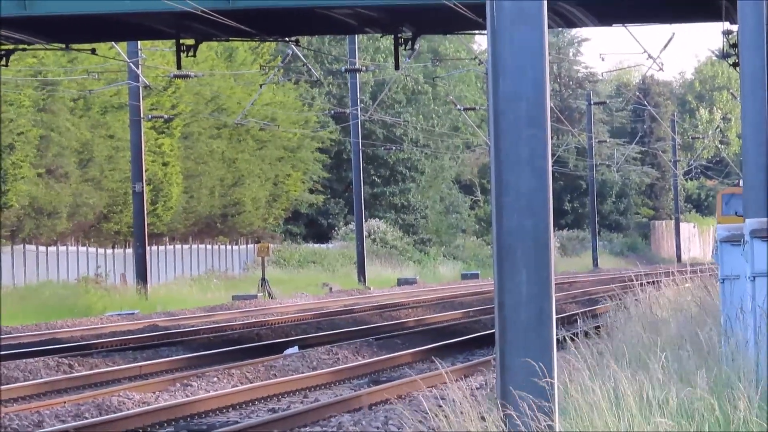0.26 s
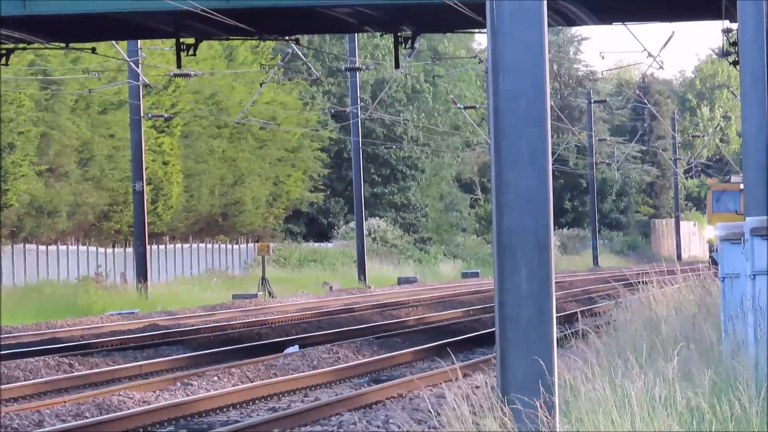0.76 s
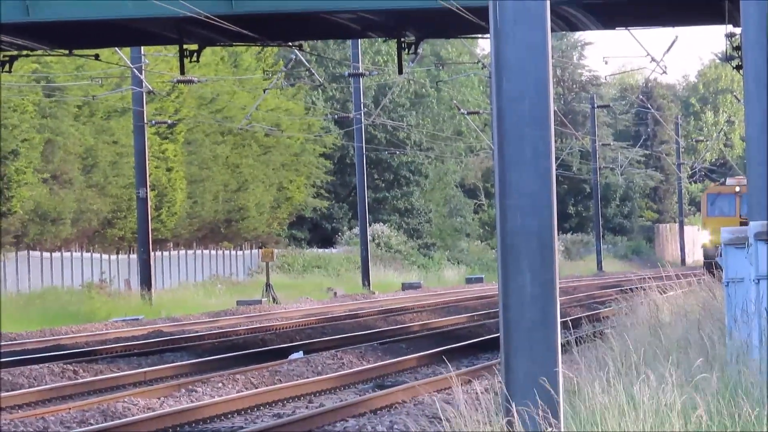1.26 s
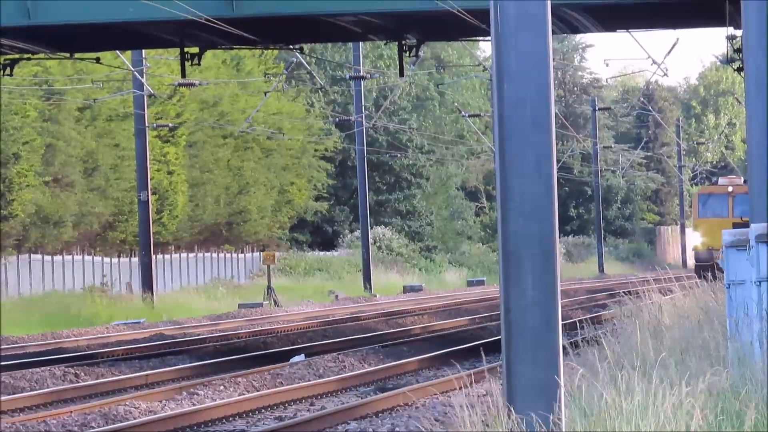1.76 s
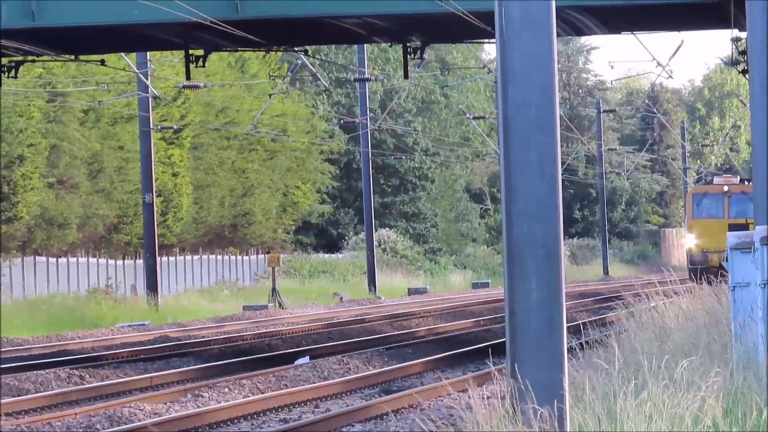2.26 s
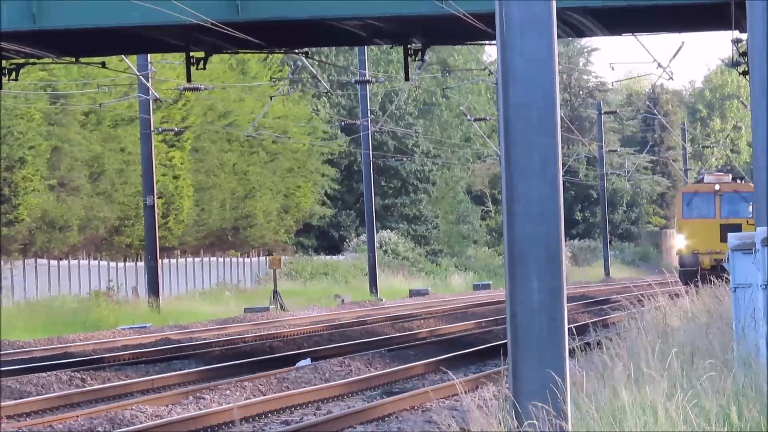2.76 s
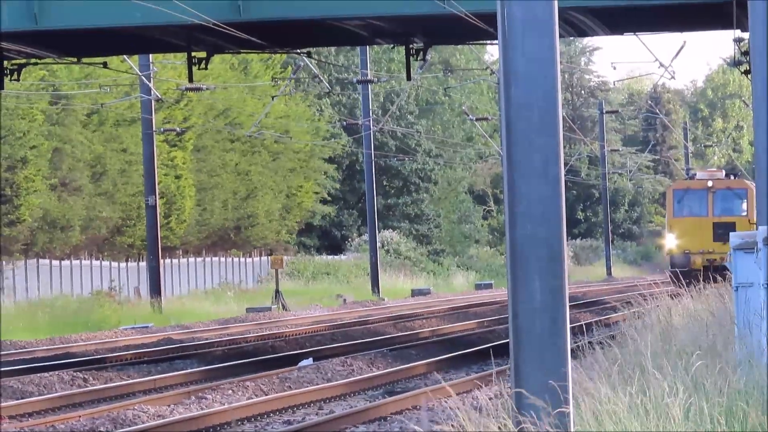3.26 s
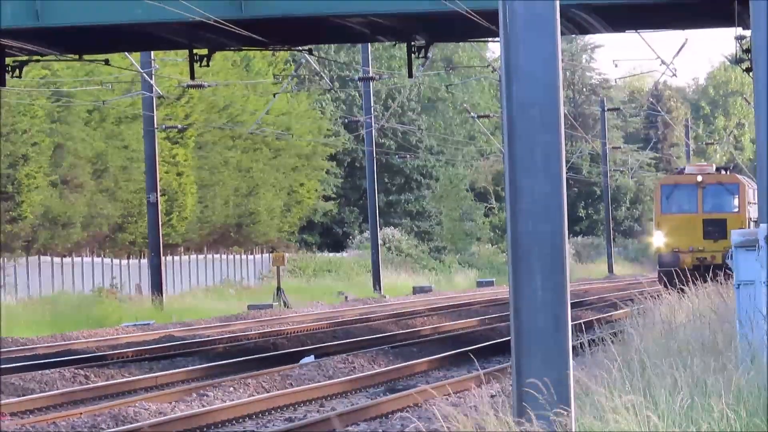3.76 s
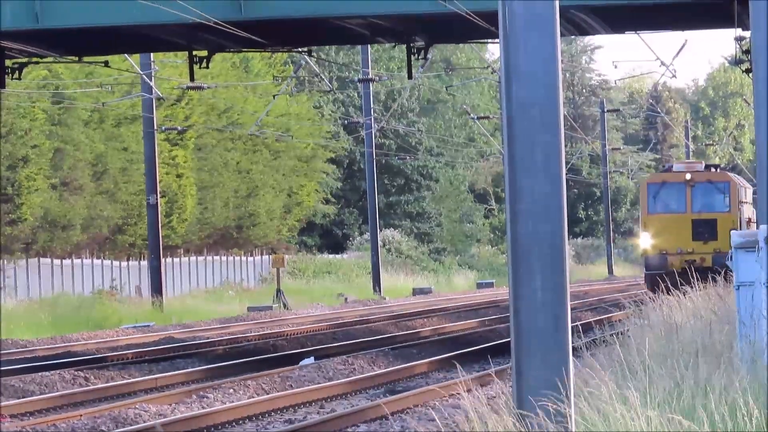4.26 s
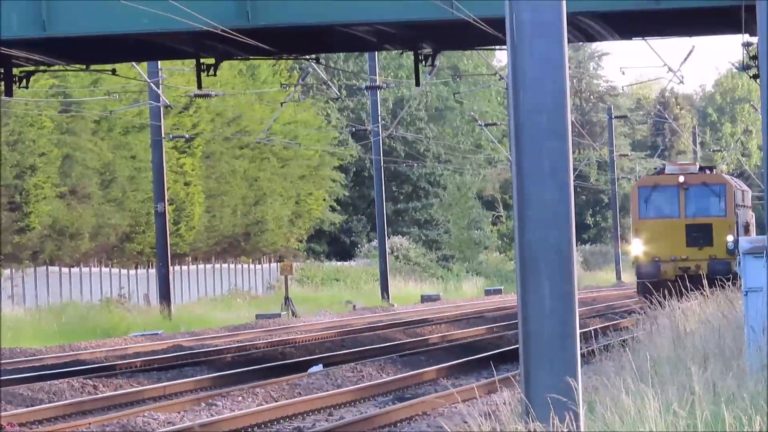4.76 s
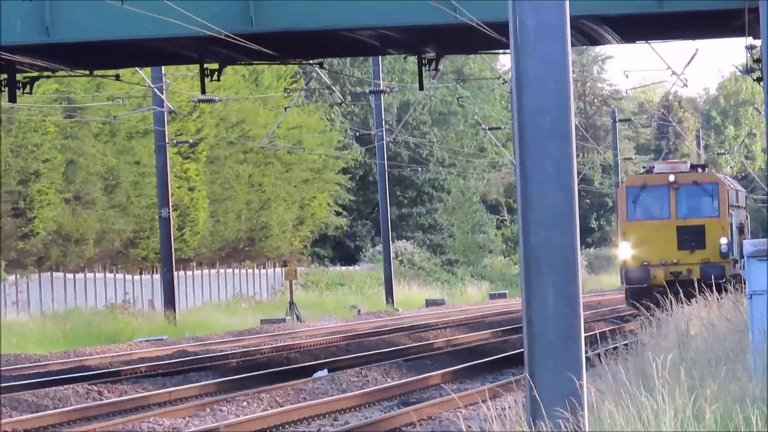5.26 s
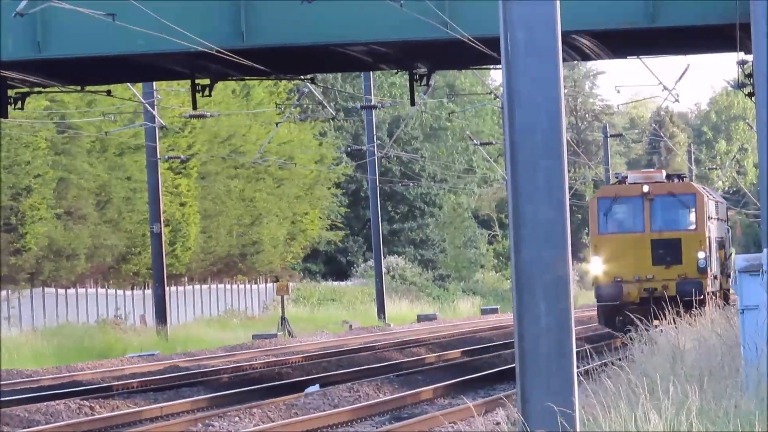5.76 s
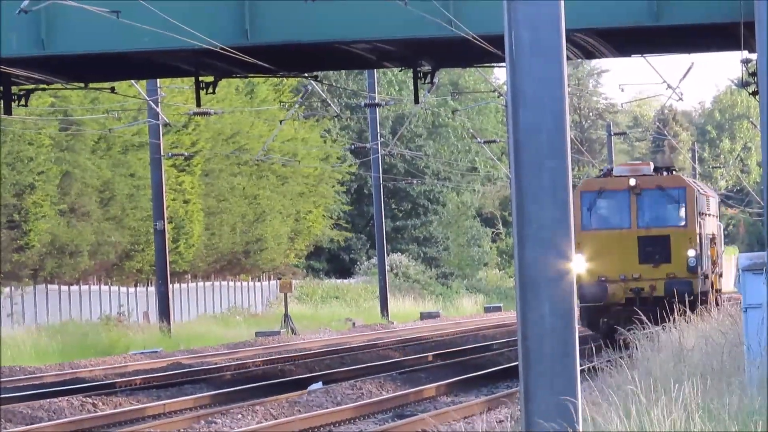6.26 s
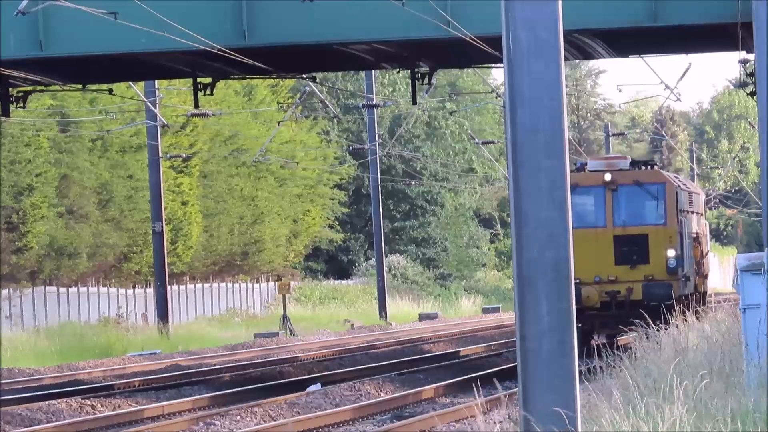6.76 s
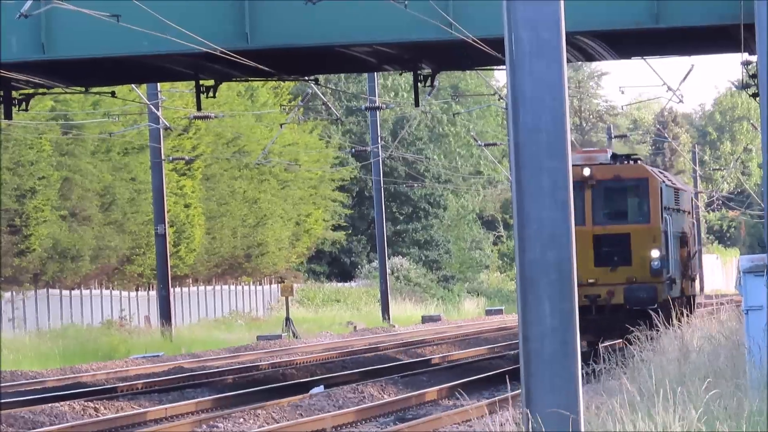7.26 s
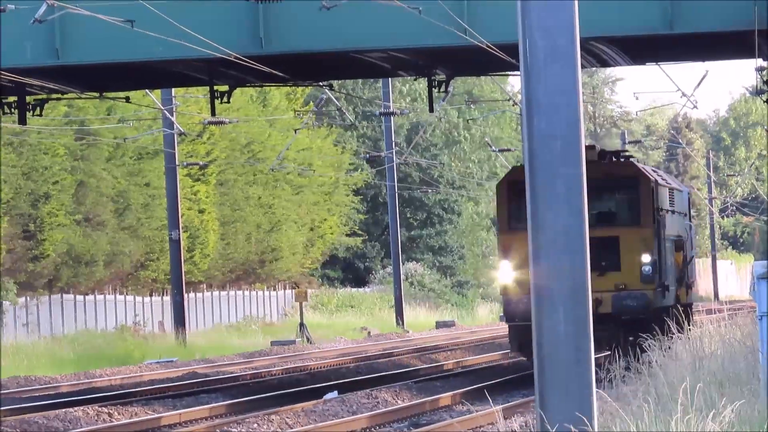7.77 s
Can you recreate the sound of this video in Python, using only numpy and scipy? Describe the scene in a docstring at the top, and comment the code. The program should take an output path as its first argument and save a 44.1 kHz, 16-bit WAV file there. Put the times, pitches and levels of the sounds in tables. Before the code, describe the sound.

Wind buffets and pops the microphone while a track machine slowly nears, its wheels beating the rails rapidly over a growing drone and hiss.

```python
"""Gusts rumble on the microphone first, low filtered noise, with a pigeon's coo (gliding sines) beneath.
Its two capsules overload and pop as they stick and again as they free: steps that die away.
A track machine nears along the rails: rough rolling, and wheels beating them fifteen times a second.
A drone and whines come with it. A small bird chirps; hiss, faint mains buzz and a flickering whistle
lie in the treble."""
import sys
import numpy as np
from scipy.fft import rfft, irfft, next_fast_len
from scipy.io import wavfile
from scipy.ndimage import map_coordinates

SR = 44100
rng = np.random.default_rng(int(sys.argv[2]) if len(sys.argv) > 2 else 0)


def inscribe(sig):
    """Save sig as 16-bit PCM at rate SR to the path in sys.argv[1].

    A 1-D sig is mono; a 2-D sig holds one channel per row.
    Samples are clipped to [-1, 1] before scaling.
    """
    pcm = np.round(np.clip(np.atleast_2d(sig).T, -1, 1) * 32767)
    wavfile.write(sys.argv[1], SR, pcm.astype(np.int16))


N = 353682
TIME = np.arange(N) / SR  # s


def amp(db):
    """Gain of a level in dB."""
    return 10 ** (np.asarray(db) / 20)


def unit(x):
    """Scaled to rms 1."""
    return x / np.sqrt(np.mean(x ** 2) + 1e-20)


def along(points, hz):
    """Value at each frequency from (f/Hz, value) points, joined on a log axis."""
    f, value = np.transpose(points)
    return np.interp(np.log(hz + 1), np.log(f + 1), value)


def curves(rows):
    """One value per sample for each column after the time."""
    seconds, *columns = np.transpose(rows)
    return [np.interp(TIME, seconds, column) for column in columns]


def wobble(rate):
    """A smooth random curve, rate knots a second."""
    knots = rng.standard_normal(int(N * rate / SR) + 4)
    return map_coordinates(knots, [TIME * rate])


def filtered(x, response):
    """x times a complex response of frequency."""
    m = next_fast_len(N + SR // 2)  # padded so that tails do not wrap round
    spectrum = rfft(x, m) * response(np.fft.rfftfreq(m, 1 / SR))
    return irfft(spectrum, m)[..., :N]


def noise(response):
    """Coloured noise of rms 1."""
    return unit(filtered(rng.standard_normal(N), response))


def band(centre_hz, width_hz):
    """Narrow noise: a fuzzy tone."""
    return noise(lambda hz: 1 / (1 + (2 * (hz - centre_hz) / width_hz) ** 2))


def spikes(seconds, sizes):
    """Silence with one sample set at each moment."""
    at = np.clip(np.round(seconds * SR).astype(int), 0, N - 1)
    return np.bincount(at, sizes, N)


def decay(hz, seconds):
    """Response of a jump that dies exponentially."""
    return SR * seconds / (1 + 2j * np.pi * hz * seconds)


# Level of the rails and treble: sinks after bursts of pops, then swells;
# engine() and the rail functions use it too.
# Columns: t/s, base level of the rails/dB, base level of the treble/dB
BASE_LEVELS = [(0.0, -34.5, -45.5), (0.7, -38, -49), (1.42, -40, -52.5), (2.41, -31, -48.5),
               (3.25, -26.5, -43.5), (4.3, -28.5, -46), (4.5, -32.5, -50.5), (4.94, -40, -56),
               (5.21, -37, -56.5), (8.01, -21, -42)]
# Colour of the far hiss. Columns: f/Hz, relative level per Hz/dB
HISS_COLOUR = [(900, -95), (1400, 2), (3100, -7.5), (5900, -10.5), (7300, -14), (8200, -18.5),
               (11000, -22.5), (14800, -26.5), (15700, -21)]
# Mains buzz lines. Columns: f/Hz, level before the treble gains/dB
BUZZ_LINES = [(3548, -66), (3648, -66), (3947, -68), (7145, -72), (7245, -74), (12042, -80), (14340, -77),
              (14540, -75.5), (14740, -78), (15240, -79)]
ROAR_S, ROAR_DB = 4.4, -5  # the roar grows for one second from here; dB over the treble level


def treble():
    """Far hiss, buzz sines, a flickering whistle that fades in, high bands and a late roar, on one level."""
    treble_db = curves(BASE_LEVELS)[1]
    flicker = amp(.8 * wobble(7) + .8 * wobble(40))
    hiss = flicker * noise(lambda hz: amp(along(HISS_COLOUR, hz)) * (hz < 15750))
    buzz = np.zeros(N)
    for hz, db in BUZZ_LINES:
        buzz += amp(db + wobble(6)) * np.sin(2 * np.pi * (hz * TIME + rng.random()))
    whistle_db = -17.5 + 3.03 * np.minimum(TIME, 2) + 3.7 * wobble(25)
    whistle = amp(whistle_db) * band(6473, 94)
    high_bands = band(10650, 350) + amp(-4) * band(11800, 300)
    high_bands *= amp(-22.5) * np.minimum(TIME / 2, 1)
    roar = amp(ROAR_DB) * np.clip(TIME - ROAR_S, 0, 1) * band(2750, 950)
    return amp(treble_db) * (hiss + whistle + roar + high_bands + amp(49.5) * buzz)


def swell(start, end):
    """Progress from 0 to 1 through a note, and a rounded rise and fall over it."""
    u = np.clip((TIME - start) / (end - start), 0, 1)
    return u, np.sqrt(np.abs(np.sin(np.pi * u))) * (u < 1)


def bird(notes, waver_hz):
    """Soft gliding sine notes, the pitch wavering at random."""
    out, drift = np.zeros(N), waver_hz * wobble(20)
    for start, end, first_hz, last_hz, db in notes:
        u, envelope = swell(start, end)
        pitch = first_hz + (last_hz - first_hz) * u + drift
        out += amp(db) * envelope * np.sin(2 * np.pi * np.cumsum(pitch) / SR)
    return out


# Pigeon notes, the first already under way at t = 0.
# Columns: start t/s, end t/s, first f/Hz, last f/Hz, level/dB
PIGEON_COOS = [(-.1, .13, 515, 508, -43), (.3, .62, 500, 508, -41), (1.4, 1.58, 500, 482, -43),
               (1.71, 2.1, 488, 465, -45.5)]


def pigeon():
    """Low coos: sines with little waver."""
    return bird(PIGEON_COOS, waver_hz=3)


# Small bird's notes. Columns: start t/s, length/ms, first f/Hz, last f/Hz, level/dB
BIRD_CHIRPS = [(3.132, 10, 4900, 4400, -49), (3.155, 9, 4800, 4350, -49), (3.199, 15, 5450, 4450, -46),
               (3.234, 10, 5250, 4350, -44)]


def small_bird():
    """Short falling chirps: sines with more waver."""
    notes = [(s, s + ms / 1000, first, last, db) for s, ms, first, last, db in BIRD_CHIRPS]
    return bird(notes, waver_hz=40)


# Gusts at the microphone.
# Columns: t/s, rumble level/dB, flutter level before its random swells/dB
GUSTS = [(0, -18, -29), (.45, -18.5, -35.5), (.7, -15, -34), (1.1, -14, -44), (1.5, -20.5, -46),
         (2.15, -27.5, -48), (2.7, -24.5, -59), (3.05, -15, -33.5), (3.7, -12, -34), (4.3, -8.5, -28.5),
         (4.5, -15, -40), (4.62, -12, -42), (4.74, -6, -43), (4.86, -18, -46), (5.05, -15.5, -44),
         (5.4, -24.5, -54), (5.62, -19.5, -55), (5.82, -30, -63), (5.98, -14.5, -49), (6.55, -21, -64),
         (7, -13, -41), (7.2, -28, -56), (8.02, -20, -58)]
# Colour of the low turbulence. Columns: f/Hz, relative level per Hz/dB
RUMBLE_COLOUR = [(8.8, -18), (15, 8.5), (50, 1.5), (233, -26), (327, -32.5), (413, -33.5), (470, -52),
                 (1100, -120)]


def wind():
    """Low turbulence in lumps and a higher flutter that shares them, the same on both capsules."""
    rumble_db, flutter_db = curves(GUSTS)
    lumps = wobble(14)
    rumble = unit(amp(2.1 * lumps) * noise(lambda hz: amp(along(RUMBLE_COLOUR, hz))))
    flutter = noise(lambda hz: np.exp(-((hz - 120) / 90) ** 2))
    flutter *= amp(1.9 * wobble(9.8) + 2.0 * lumps)
    return amp(rumble_db) * rumble + amp(flutter_db) * flutter


# Overloads of the microphone's two capsules; dips() uses them too. Columns: start t/s, held/ms,
# right step, left step (linear, before filters), left sticks longer at each end/ms (0: a small scatter)
CAPSULE_OVERLOADS = [(0.2568, 10.9, 1.05, .7, 1.8), (0.4479, 1.5, 0, .65, 0), (0.4496, .65, 0, .65, 0),
                     (0.451, .3, 0, .6, 0), (0.5768, 3.1, .8, .53, .8), (0.6566, 14, .77, .44, .7),
                     (0.7191, 8.7, .55, .2, -.6), (0.9407, 26.4, .8, .51, .3), (0.9897, 12.8, .51, .19, 0),
                     (1.0335, 16.4, .76, .43, .3), (1.0638, 21.7, .46, .16, 0),
                     (1.1051, 14.8, .67, .35, .5), (1.2222, 7.2, .44, .15, 0), (1.2442, 35, .7, .38, .8),
                     (1.2992, 10.7, .45, .17, 0), (1.3341, 12.9, .71, .41, .4), (1.4366, .5, .36, 0, 0),
                     (1.4373, 7.8, .36, 0, 0), (1.441, 1.3, 0, .15, 0), (1.7769, 6.2, 0, .5, 0),
                     (1.7834, .6, 0, .6, 0), (4.416, 5.1, .62, .6, .3), (4.7341, .4, .39, 0, 0),
                     (4.7349, .5, .44, 0, 0), (4.7422, 5.4, .32, .2, 0), (4.7672, 5.3, .16, .11, 0),
                     (4.8057, 8.6, .17, .12, 0), (4.8236, 5.1, .17, .12, 0), (4.8755, 15, .16, .11, 0),
                     (4.9517, 15.9, .13, .1, 0), (4.981, 18.9, .13, .09, 0), (5.1751, 7.5, .18, .12, .45),
                     (5.9444, 4.9, .3, .21, .8), (6.0266, 35.9, .34, .22, .3), (6.1074, 13, .36, .22, 1.6),
                     (6.1143, 4.2, .36, 0, 0), (6.1658, 4.1, .32, .25, .8), (6.2443, .25, .36, .24, 2),
                     (6.2453, .3, .36, 0, 0), (6.83, 9.3, .44, .3, .7)]


def pops():
    """Each capsule jumps as it sticks at its limit and back as it frees; the gust pushes, then sags."""
    start, held_ms, right, left, longer_ms = np.transpose(CAPSULE_OVERLOADS)
    side = np.array([[-1], [1]])  # -1 at the start, 1 at the end
    right_s = start + (side > 0) * held_ms / 1000
    scatter = rng.uniform(.0001, .0008, (len(start), 2)).T
    # left outlasts right where its step is over .45 of the right's, else right outlasts left
    scatter *= np.where(left > .45 * right, 1, -1)
    longer_s = np.where(longer_ms != 0, longer_ms / 1000, scatter * (right > 0))
    left_s = right_s + side * longer_s
    left_kicks = spikes(left_s.ravel(), (-side * left).ravel())
    right_kicks = spikes(right_s.ravel(), (-side * right).ravel())
    kicks = np.array([left_kicks, right_kicks])
    jump = filtered(kicks, lambda hz: decay(hz, 0.00074) * 1j * hz / (120 + 1j * hz))
    # a dull copy leaks across to the other capsule
    leak = filtered(jump[::-1], lambda hz: amp(-9.0) / (1 + 1j * hz / 350))
    push = filtered(kicks.mean(0), lambda hz: amp(37) * hz / 60 * np.exp(-(hz / 60) ** 2))
    sag_spikes = spikes(start + .004, np.maximum(right, left))
    sag = filtered(sag_spikes, lambda hz: -amp(47) * np.exp(-(hz / 70) ** 2) * hz / (hz + 15))
    return jump + leak + push + sag


DIP_DB, DIP_S = 2, 0.035  # depth for a step of 1, time constant of the recovery


def dips():
    """Gain of the sound beyond the microphone: it drops as a capsule frees and soon recovers."""
    start, held_ms, right, left, _ = np.transpose(CAPSULE_OVERLOADS)
    freed = spikes(start + held_ms / 1000, np.maximum(right, left))
    return amp(-DIP_DB * filtered(freed, lambda hz: decay(hz, DIP_S)))


# Faint pitched hiss from the machine.
# Columns: start t/s, end t/s, centre f/Hz, width/Hz, level before a random waver/dB
ENGINE_WHINES = [(1.2, 6.5, 1647, 40, -57.5), (3.9, 4.9, 2510, 30, -58), (3.8, 4.9, 2860, 250, -55.5),
                 (5.4, 17, 2084, 140, -50), (5.5, 13.4, 1600, 200, -47.5)]
DRONE_DB, DRONE_GAINS_DB_PER_S = -26, 1.85  # drone band over the rails at t = 0; it gains on them


def engine():
    """A narrow drone that gains on the rails as the machine nears, and fainter whines that come and go."""
    pitch = 416 + 6 * wobble(8)
    tone = np.sin(2 * np.pi * np.cumsum(pitch) / SR) * amp(1.5 * wobble(4))
    drone_db = curves(BASE_LEVELS)[0] + DRONE_DB + DRONE_GAINS_DB_PER_S * TIME
    out = amp(drone_db) * (band(413, 64) + amp(3.5) * tone)
    for start, end, hz, width_hz, db in ENGINE_WHINES:
        _, envelope = swell(start, end)
        out += amp(db + wobble(13)) * envelope * band(hz, width_hz)
    return out


# Band that the rail passes. Columns: f/Hz, relative level per Hz/dB
RAIL_BAND = [(300, -15), (420, -17.5), (500, -13), (600, -6), (800, -13), (980, -11), (1150, -7),
             (1290, -10), (1330, -47), (2200, -34.5), (3500, -64)]
# Singing rail mode. Columns: f/Hz, width/Hz, level before the caller's offset/dB
RAIL_MODES = [(1066, 22.7, 4)]
# Travel along the rail from afar. Columns: f/Hz, extra delay/ms
RAIL_DELAYS = [(400, 52), (560, 43), (800, 24), (1000, 7), (1200, 0), (1350, 16)]


def track(hz, mode_db=0, path=1):
    """The rail passes its band, rings at its mode and lets each frequency arrive at its own time."""
    modes = 0
    for centre, width, db in RAIL_MODES:
        modes = modes + amp(db + mode_db) * 1j * hz * width / (centre ** 2 - hz ** 2 + 1j * hz * width)
    delay_s = path * along(RAIL_DELAYS, hz) / 1000
    phase = 2 * np.pi * np.cumsum(delay_s) * hz[1]  # delay summed over frequency; hz[1] is the bin step
    return (amp(along(RAIL_BAND, hz)) + modes / (1 + (hz / 1400) ** 8)) * np.exp(-1j * phase)


def track_gain():
    """Rms gain of the rail for white force."""
    return np.sqrt(np.mean(np.abs(track(np.linspace(0, SR / 2, 4000))) ** 2))


def rolling(rails_db):
    """Steady wheel roughness: white force with a wavering level, which barely wakes the rail's mode."""
    force = amp(rails_db - 0.5 + wobble(4.3)) * rng.standard_normal(N)
    scale = 1 / track_gain()
    return filtered(force, lambda hz: scale * track(hz, mode_db=-5))


def ring_part(hz):
    """Upper share of a beat: the ring."""
    return 1 / (1 + (970 / (hz + 1)) ** 12)


def note_part(hz):
    """Lower share of a beat: the falling note."""
    return (1 - ring_part(hz)) * (600 / (hz + 1)) / (1 + (520 / (hz + 1)) ** 10)


CLOSE_S, CLOSE_DELAY = 6.3, .6  # from this moment the rail path is short: its share of the far delays
CLOSE_NOTE_TOP_HZ = 720  # close by, the falling note starts lower


def beat_sound(moments, beat_db, clean_db, grind_db, part):
    """One share of every beat: a clean knock on the rail and the wheel's noisy grind through it."""
    scale = 1 / track_gain()
    grinds = spikes(moments + 0.0067, amp(beat_db + grind_db))
    pressure = filtered(grinds, lambda hz: np.exp(-(hz / 40) ** 2))
    scrape = amp(30.0) * pressure * rng.standard_normal(N)
    out = filtered(scrape, lambda hz: scale * part(hz) * track(hz))
    close_top_hz = CLOSE_NOTE_TOP_HZ if part is note_part else SR
    far, close = (1, SR, moments < CLOSE_S), (CLOSE_DELAY, close_top_hz, moments >= CLOSE_S)
    for path, top_hz, there in (far, close):
        knocks = spikes(moments, there * amp(beat_db + clean_db))
        # knocks ring the mode more strongly than the grind
        out += filtered(knocks, lambda hz: scale * part(hz) * track(hz, 4, path) / (1 + (hz / top_hz) ** 8))
    return out


RASP_HZ, RASP_DB, RASP_FADES_DB_PER_S = 1275.6, -11.5, 1.53  # base level over the rails; falls behind them


def rasp(moments, rails_db, odd, chance):
    """A higher band of noise pulsed by the beats, mostly by the second wheel."""
    rasp_db = rails_db + RASP_DB - RASP_FADES_DB_PER_S * moments + 9 * odd + 3 * chance
    pulses = filtered(spikes(moments + .012, amp(rasp_db)), lambda hz: SR / 30 * np.exp(-(hz / 18) ** 2))
    return pulses * noise(lambda hz: np.exp(-((hz - RASP_HZ) / 40) ** 2))


# Hard wheel blows. Columns: t/s, ring level before gains/dB, falling note level before gains/dB
HARD_BLOWS = [(2.813, -29, -16.5), (2.9472, -24, -45), (3.2677, -22, -32.5), (3.4045, -21, -37),
              (3.533, -19.5, -31), (3.6072, -23, -21), (3.8678, -26, -14.5), (4.0014, -28.5, -24),
              (4.197, -26, -18.5), (5.533, -28, -45), (5.869, -32, -23), (6.477, -24.5, -20),
              (6.545, -29, -11.5), (7.357, -23, -9.5), (7.489, -22, -10), (7.625, -25, -7),
              (6.7461, -21.5, -18), (7.1436, -26, -41), (7.2231, -24.5, -13), (7.2877, -19, -44),
              (7.4194, -18.5, -13), (7.554, -20, -27), (7.69, -16.5, -10.5), (7.9601, -16.5, -9)]
# How much weaker the second wheel rings. Columns: t/s, drop in level/dB
SECOND_WHEEL_DROP = [(0, 2), (4.4, 2), (5.2, 6), (8.02, 4.5)]


def rails():
    """Rolling roughness plus wheel beats; two wheels take turns, one ringing, one with a falling note."""
    rails_db = curves(BASE_LEVELS)[0]
    turns = .185 + 15.269 * TIME - .02756 * TIME ** 2  # beats so far, slowing slightly
    at = np.flatnonzero(np.diff(np.floor(turns)))
    odd = np.floor(turns[at + 1]) % 2  # 1 for the second wheel
    chance = rng.standard_normal((len(at), 4))
    moments = at / SR - .009 + 0.002135 * chance[:, 0]
    weaker_db = curves(SECOND_WHEEL_DROP)[0][at] * odd - 1.5 * chance[:, 1]
    ring_db = rails_db[at] + 4 - weaker_db
    note_db = rails_db[at] + 3.5 + 5 * odd + 2 * chance[:, 2]
    hard_s, hard_ring_db, hard_note_db = np.transpose(HARD_BLOWS)
    # a hard blow takes the place of the nearest beat
    hard = np.abs(moments[:, None] - hard_s).argmin(axis=0)
    moments[hard], ring_db[hard], note_db[hard] = hard_s, hard_ring_db, hard_note_db
    # ordinary beats are more grind than knock, hard blows mostly knock
    clean_db, grind_db = np.full(len(at), -3.), np.zeros(len(at))
    clean_db[hard], grind_db[hard] = 3, -6
    out = rolling(rails_db)
    out += beat_sound(moments, ring_db + 26, clean_db, grind_db, ring_part)
    out += beat_sound(moments, note_db + 24, clean_db, grind_db, note_part)
    return out + rasp(moments, rails_db[at], odd, chance[:, 3])


def scene():
    """Everything but the pops reaches both channels alike; wind and pops arise at the microphone."""
    beyond = treble() + pigeon() + small_bird() + engine() + rails()
    return dips() * beyond + wind() + pops()


TOP_HZ = 16800  # band limit


def record(dry):
    """Peaks round off just below full scale; nothing is kept above the band limit."""
    rounded = .96 * dry / (1 + np.abs(dry) ** 16) ** (1 / 16)
    return filtered(rounded, lambda hz: hz < TOP_HZ)


dry = scene()
out = record(dry)
inscribe(out)
```